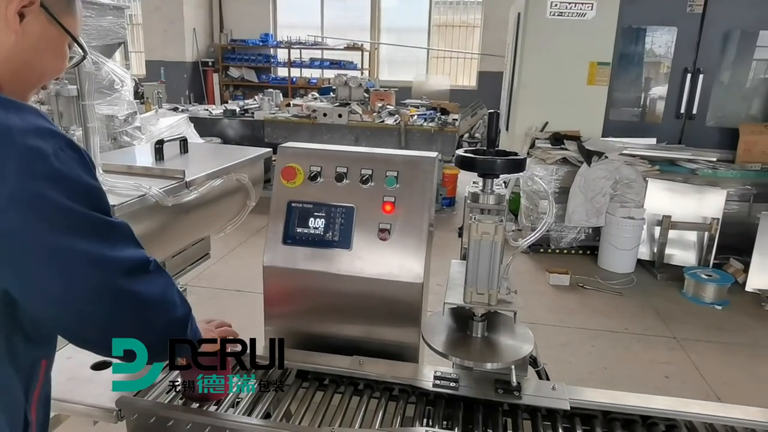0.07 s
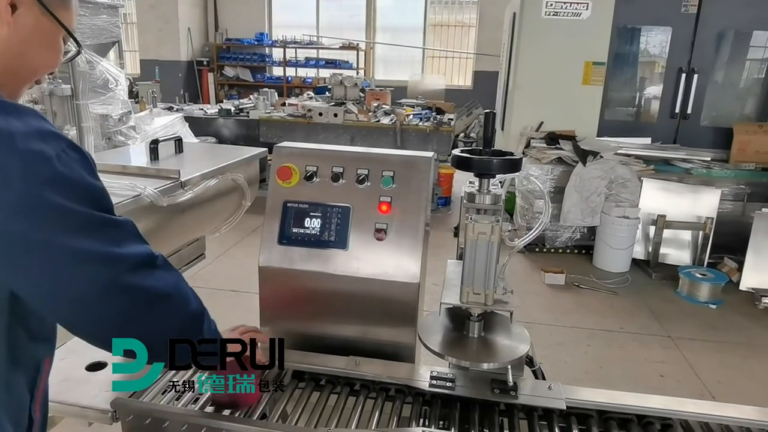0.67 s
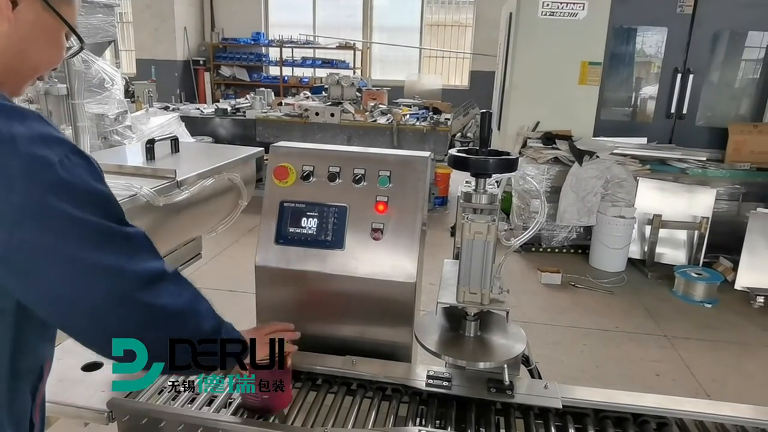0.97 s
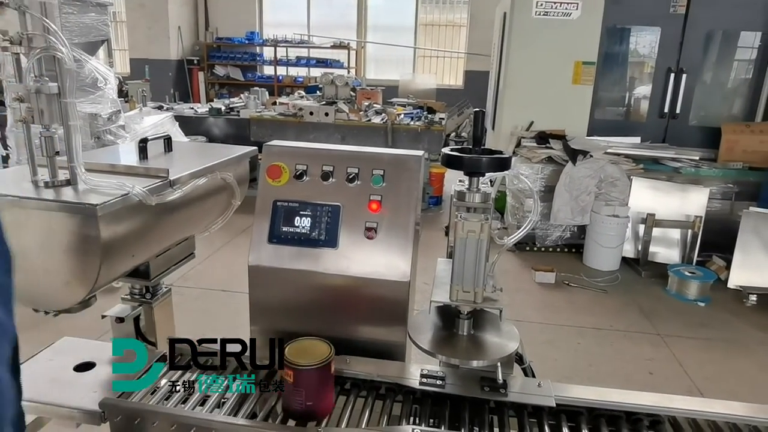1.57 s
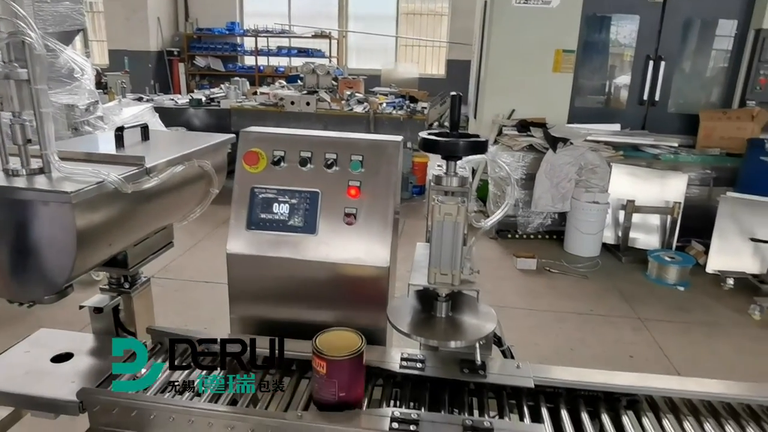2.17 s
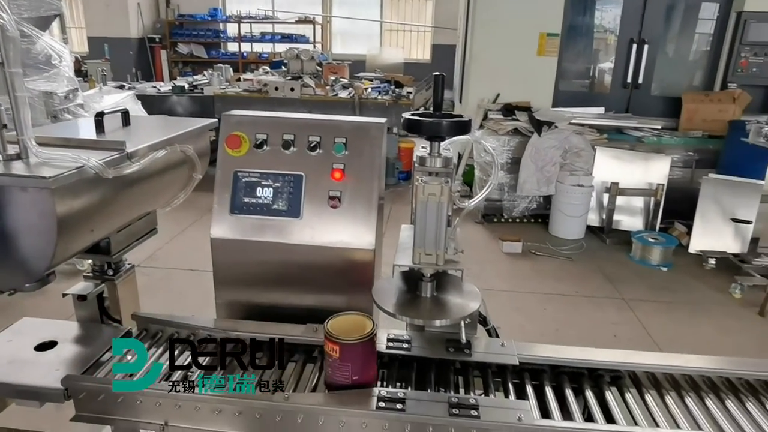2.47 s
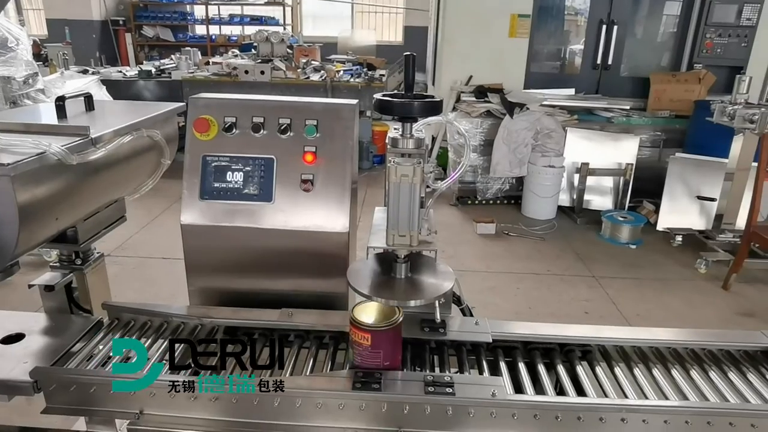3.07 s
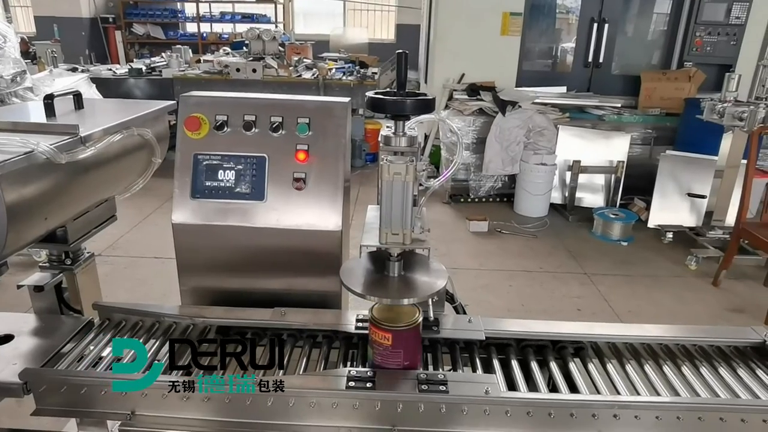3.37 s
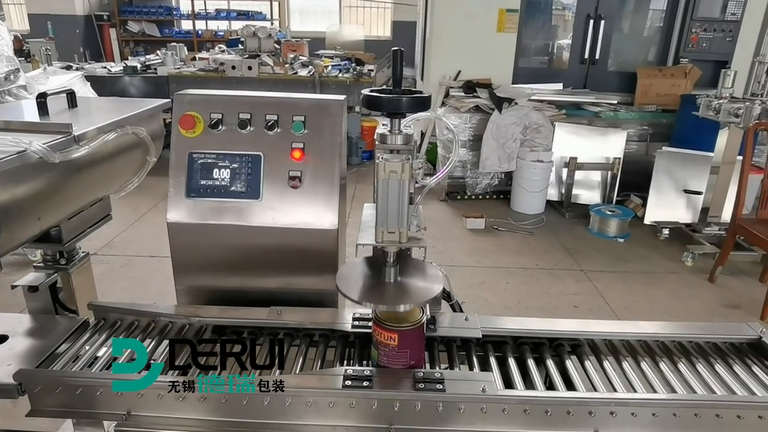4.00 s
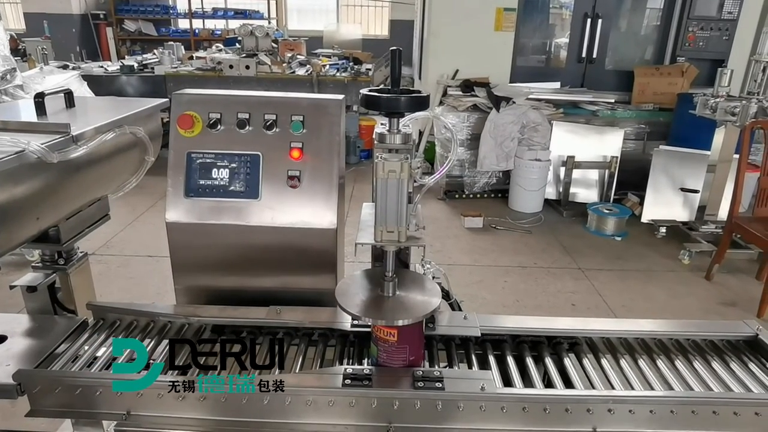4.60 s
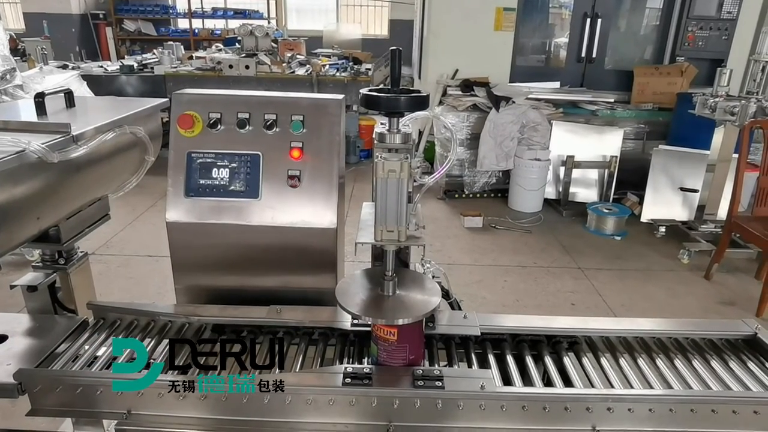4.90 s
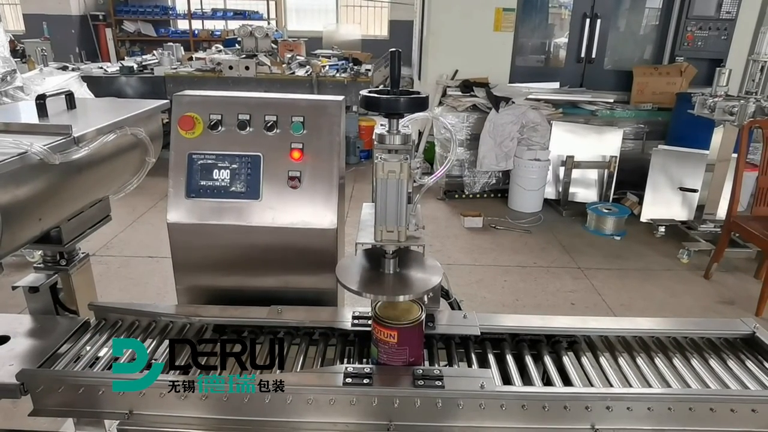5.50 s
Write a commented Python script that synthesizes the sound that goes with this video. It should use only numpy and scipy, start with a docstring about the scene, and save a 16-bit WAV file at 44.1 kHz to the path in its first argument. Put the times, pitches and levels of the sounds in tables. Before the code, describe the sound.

Steel rollers rumble and rattle steadily with a hiss and a faint motor hum, heard from nearby. Scattered metal clacks and a very high, intermittent bearing squeal run through it as a tin travels along. Near the end a valve puffs air and a lid press thuds down, then knocks back up amid sharp clacks and the ring of the tin. The workshop adds a short echo.

```python
"""A roller conveyor carries a tin through a workshop to an air-driven lid press.
The rollers rumble, hiss and tick, a dry bearing squeals, and the motor hums.
Steel clacks on steel, and the thin tin rings when it is knocked. Near the end the
valve puffs air, the press comes down on the lid with a shudder and knocks back up.
Nearby steel sheets and the walls add short echoes."""
import sys
import numpy as np
from scipy import signal
from scipy.fft import rfft, irfft, next_fast_len
from scipy.io import wavfile
from scipy.ndimage import uniform_filter1d

SR = 44100
rng = np.random.default_rng(int(sys.argv[2]) if len(sys.argv) > 2 else 0)


def to_wav(s):
    """Save 16-bit WAV."""
    ch = np.atleast_2d(s).T  # columns
    pcm = np.round(np.clip(ch, -1, 1) * 32767)  # PCM
    wavfile.write(sys.argv[1], SR, pcm.astype(np.int16))


N = 249165
T = np.arange(N) / SR

# how alike the line sounds in both ears: (frequency [Hz], likeness [1 = same, 0 = unrelated])
LINE_LIKENESS = [(100, 0.97), (250, 0.96), (500, 0.78), (1000, 0.0018), (2200, -0.049), (4000, 0.012),
                 (6500, -0.041), (8200, -0.092)]
# notes at which the roller frame and tin ring: (pitch [Hz], width [Hz], relative level [dB])
STEEL_NOTES = [(274, 160, 4), (524, 36, -17), (727, 37, 10), (1290, 9.7, 8), (1610, 50, 4.5),
               (2150, 220, 7.5), (2564, 52, 13)]


def conveyor():
    """The turning rollers rumble and hiss, and their frame adds a deeper rumble."""
    # tone of the rollers, frame, hiss and highest hiss: (frequency [Hz], relative level [dB])
    roller_tone = [(45, -39), (75, -2.5), (150, -6), (297, -10), (330, -12.5), (480, -17.5), (531, -6),
                   (641, -14.5), (1010, -15), (1100, -11), (1330, -17.5), (1890, -16), (2430, -13.5),
                   (3600, -24.5), (4700, -38), (7900, -120)]
    frame_tone = [(15, -30), (25, 5), (40, 5), (58, 12.5), (75, 2.5), (110, -51)]
    hiss_tone = [(1700, -18), (2450, 2.5), (3000, -1), (4000, -3), (5000, 4.5), (5700, 1.5), (6400, 5),
                 (7200, 0.5), (8600, 5.5), (9300, -11.5), (10500, -57)]
    sizzle_tone = [(7500, -39), (8800, 4), (9800, 2), (11000, -19.5), (14000, -12.5), (15500, -34)]
    # how the frame's rumble and the hiss rise and fall: (time [s], relative level [dB])
    frame_levels = [(0.0, -46), (0.36, -50.5), (1.76, -57), (2.16, -47), (3.62, -51), (5.44, -51.5),
                    (5.65, -51)]
    hiss_levels = [(0.0, -35.5), (0.22, -45.5), (1.15, -46), (4.2, -43), (4.45, -50), (4.86, -50.5),
                   (5.18, -51), (5.35, -42), (5.65, -39)]
    nearer_db = 0.27 * T  # the rollers draw nearer
    rumble = from_db(-41.5 + nearer_db + 1.38 * drift(30)) * noise(roller_tone)
    frame = from_db(over_time(frame_levels) + 0.5) * noise(frame_tone)
    hiss = from_db(over_time(hiss_levels) + 4) * noise(hiss_tone)
    # the highest hiss drops away for a moment, then returns
    sizzle = from_db(-51 - 23 * treble_dip()) * noise(sizzle_tone)
    flutter = from_db(1.6 * drift(40))  # uneven rubbing makes the whole hiss flutter together
    return frame + panel_echoes(rumble + rattle() + flutter * (hiss + sizzle))


def rattle():
    """Small random ticks run through the steel frame and make it ring."""
    ticks_per_s = 70
    ticks = (rng.random(N) < ticks_per_s / SR) * rng.standard_normal((2, N))
    ticks = signal.sosfilt(signal.butter(4, 4500, fs=SR, output="sos"), ticks + 1e-18)
    ringing = sum(from_db(db) * resonate(ticks, hz, width) for hz, width, db in STEEL_NOTES)
    return from_db(-53) * unit_power(ringing)


def clacks():
    """Steel hits steel along the line, setting the roller frame and tin ringing."""
    # (time [s], relative level [dB], time to fade 60 dB [s], ring [Hz], ring boost [dB], dull above [Hz])
    hits = [(0.001, -34, 0.16, 1140, 25, 9000), (0.130, -23.5, 0.096, 3600, 14, 9050),
            (0.469, -25.5, 0.03, 7060, 14.5, 10200), (0.717, -34.5, 0.082, 5250, 18, 9000),
            (0.964, -27.5, 0.21, 1230, 4, 4000), (1.592, -29, 0.019, 5160, 17, 9000),
            (1.633, -22, 0.088, 2110, 1, 4470), (2.288, -25.5, 0.13, 2660, 6, 6000),
            (2.487, -22, 0.14, 1080, 0, 1300), (2.754, -22.5, 0.053, 2750, 15, 4500),
            (3.281, -30.5, .05, 5100, 13, 8000), (3.467, -26, 0.098, 2400, 9, 5000),
            (3.6155, -17.5, 0.11, 9560, 5, 9100), (3.620, -24, 0.24, 2490, 13, 5130),
            (3.643, -19, 0.19, 1630, 12.5, 2940), (3.663, -23, 0.078, 750, 6, 1800),
            (4.270, -18.5, 0.081, 1290, 24, 6100), (4.283, -21, 0.12, 1640, 12, 2980),
            (4.362, -23, 0.24, 1380, 16, 3460), (4.383, -18, 0.17, 1440, 14, 2950),
            (4.401, -23, 0.098, 2710, 18, 2750), (4.422, -22, 0.13, 2050, 10.5, 2390),
            (5.250, -15.5, 0.17, 2470, 17.5, 9600), (5.254, -15, 0.02, 2150, 7, 9400),
            (5.280, -23, 0.13, 1820, 8, 8860), (5.300, -14, 0.072, 2120, 13, 5800),
            (5.318, -15, 0.087, 2420, 4, 4850), (5.520, -22.5, 0.22, 2900, 9, 5040)]
    return blows(hits, STEEL_NOTES, ring_sharpness=16.6, direct_db=-1.5, rise_s=0.00071)


def bearing_squeal():
    """A dry bearing catches and sings on close, beating notes, or slips to a weaker, lower one."""
    # notes of the bearing: (pitch [Hz], width [Hz], relative level [dB])
    notes = [(8150, 46, -9), (8110, 28, -1), (8162, 40, 1.5), (8205, 59, 2.5), (8020, 220, -8),
             (7800, 190, -25)]
    # main and lower squeals: (start [s], length [s], relative level [dB], fade [dB per s])
    main_squeals = [(-0.04, 0.24, -25.5, 30.5), (0.71, 0.18, -33, 45), (1.37, .06, -39.5, 49),
                    (1.69, 0.039, -22, 164), (1.78, 0.3, -38, 30), (2.08, 0.24, -27.5, 52),
                    (2.61, 0.049, -32, 60), (2.71, 0.44, -24.5, 105), (3.2, 1.304, -28, 49),
                    (4.82, 0.14, -34, 63), (4.975, 0.36, -23.5, 22)]
    low_squeals = [(-0.06, .2, -36.5, 130), (1.16, 0.061, -40, 60), (2.5, .11, -40, 38)]
    flutter = from_db(1.5 * drift(30))
    main = swells(main_squeals, rise_s=0.025) * friction_tone(notes, smooth_s=0.037, evenness=0.7)
    low_note = friction_tone([(7540, 82, 0)], smooth_s=0.038, evenness=0.45)
    return flutter * (main + swells(low_squeals, rise_s=0.056) * low_note)


def press():
    """Air rushes from the valve, the piston shakes the table, and the head knocks on its stops."""
    # air puffs and table shudders: (start [s], length [s], relative level [dB], fade [dB per s])
    puffs = [(4.015, 0.021, -29, 250), (4.07, 0.086, -39, 330), (5.125, 0.053, -29.5, 60),
             (5.49, 0.058, -35, 110)]
    shudders = [(4.07, .1, -28.5, 60), (4.338, 0.062, -22, 96), (5.12, 0.032, -36, 93),
                (5.44, 0.14, -24, 170)]
    # tone of the escaping air: (frequency [Hz], relative level [dB])
    air_tone = [(500, -33), (2500, -12), (4200, -9), (5500, -5), (6500, 3), (7600, -15), (9500, -0.5),
                (11500, -9), (14000, -13.5), (16000, -31)]
    # notes of the press's table and column: (pitch [Hz], width [Hz], relative level [dB])
    table_notes = [(102.5, 12.6, 0.5), (128.7, 5.9, -5.5), (213.5, 25, -8), (251, 76, -10.5)]
    column_notes = [(229, 14, 20), (570, 36, 1.5), (758, 150, 12.5), (1040, 126, 12.5), (1387, 62, 10)]
    # the head meets its stops:
    # (time [s], relative level [dB], time to fade 60 dB [s], ring [Hz], ring boost [dB], dull above [Hz])
    hits = [(4.099, -20.5, 0.031, 2180, 14.5, 3500), (4.100, -14, 0.045, 800, 15, 1500),
            (4.105, -19, 0.23, 1090, 10, 1560), (4.345, -19.5, 0.11, 386, 17, 900),
            (5.143, -23.5, 0.17, 223, 13, 227), (5.440, -18.5, 0.11, 2120, 14, 2370),
            (5.446, -18, 0.27, 1490, 4.5, 1500), (5.455, -10.5, 0.08, 272, 10.5, 1100),
            (5.475, -24.5, 0.48, 337, 18, 1320)]
    air = swells(puffs, rise_s=0.015) * from_db(3.4 * drift(90)) * noise(air_tone)
    shudder = swells(shudders, rise_s=0.039) * friction_tone(table_notes, smooth_s=0.025, evenness=0.95)
    knocks = blows(hits, column_notes, ring_sharpness=6.0, direct_db=-3.0, rise_s=0.00061)
    return air + shudder + knocks


def tin():
    """The thin steel tin rings on; each knock tops up its notes."""
    # knocks on the tin: (time [s], level [dB])
    hits = [(0.001, -31.5), (0.135, -41), (3.622, -35), (4.403, -31.5), (5.262, -23), (5.302, -41)]
    # notes of the tin: (pitch [Hz], level against the lowest note [dB], share of the ring time [0 to 1])
    notes = [(1259, 0, 1), (1585, -16, .4), (2185, -12, .4), (2530, -10, .6)]
    ring_s = 0.3  # time to fade 60 dB
    out = np.zeros((2, N))
    for hz, note_db, share in notes:
        swing = sum((T >= s) * from_db(db - 60 * np.abs(T - s) / (share * ring_s)) for s, db in hits)
        phase = rng.uniform(0, 2 * np.pi) + np.array([[0], [0.6]])
        out += from_db(note_db) * swing * np.sin(2 * np.pi * hz * T + phase)
    return out * from_db([[1], [-1]])  # a little louder on the left


def motor():
    """The motor and gearbox hum on tones that waver with the load."""
    # tones of the motor and gears: (pitch [Hz], level [dB])
    tones = [(64.6, -54), (301.5, -56), (541, -60.5), (1087, -59), (2396, -52.5), (2595, -57)]
    whine_drop_db = 14 * treble_dip()  # the high gear whine sinks for a moment
    hum = 0
    for hz, db in tones:
        phase = 2 * np.pi * np.cumsum(hz + 7 * drift(25)) / SR
        right_shift = np.arccos(np.clip(at_hz(LINE_LIKENESS, hz), -1, 1)) * np.array([[0], [1]])
        level_db = db + 3.9 * drift(18) - whine_drop_db * (hz > 1800)
        hum = hum + np.sqrt(2) * from_db(level_db) * np.sin(phase + right_shift)
    return hum


def panel_echoes(sound, count=6, echo_db=-19):
    """Nearby steel sheets throw back quick echoes of the middle and high tones."""
    bright = signal.sosfilt(signal.butter(1, 400, "high", fs=SR, output="sos"), sound)
    delays_s = rng.uniform(0.002012, 0.022, count)
    out = sound.copy()
    for k, lag in enumerate((delays_s * SR).astype(int)):
        out[:, lag:] += (-1) ** k * from_db(echo_db) * bright[:, :-lag]
    return out


def room_echo(sound, fade_s=0.2, dull_hz=4000):
    """Walls and machines scatter the sound into a short, slightly dull tail."""
    t = T[:SR * 3 // 4]
    tail = rng.standard_normal((2, len(t))) * from_db(-60 * t / fade_s) * (t > 0.008)
    tail = signal.sosfilt(signal.butter(1, dull_hz, fs=SR, output="sos"), tail)
    return signal.fftconvolve(sound, tail / np.sqrt(np.sum(tail ** 2) / 2), axes=1)[:, :N]


def blows(hits, body_notes, ring_sharpness, direct_db, rise_s):
    """Each hit is a dying burst of noise that rings the struck spot and then the whole body."""
    # tone of steel meeting steel: (frequency [Hz], relative level [dB])
    clatter_tone = [(30, -21), (120, 2), (1000, -4), (4000, -0.5), (9800, 7.5), (12000, -5), (15000, -6)]
    # how alike nearby hits sound in both ears: (frequency [Hz], likeness [1 = same, 0 = unrelated])
    hit_likeness = [(100, .99), (500, 0.95), (1000, 0.92), (2200, 0.35), (4000, 0.12), (9000, 0.51)]
    clatter = noise(clatter_tone, hit_likeness)
    direct, size = np.zeros((2, N)), SR // 2
    for s, db, fade_s, ring_hz, ring_db, dull_hz in hits:
        start = round(s * SR)
        burst = clatter[:, start:start + size]
        t = T[:burst.shape[1]]
        burst = burst * from_db(db - 60 * t / fade_s) * (1 - np.exp(-t / rise_s))
        burst = signal.sosfilt(signal.butter(2, dull_hz, fs=SR, output="sos"), burst)
        ring = from_db(ring_db) * resonate(burst, ring_hz, ring_hz / ring_sharpness)
        direct[:, start:start + size] += burst + ring
    body = sum(from_db(db - 7.5) * resonate(direct, hz, width) for hz, width, db in body_notes)
    return from_db(direct_db) * direct + body


def friction_tone(notes, smooth_s, evenness):
    """Rubbing keeps a part's notes sounding; the contact limits how far they swing."""
    rub, tone = noise(), 0
    for hz, width, db in notes:
        ring = resonate(resonate(rub, hz, width), hz, width)
        tone = tone + from_db(db) * unit_power(ring)
    power = uniform_filter1d(np.mean(tone ** 2, axis=0), int(smooth_s * SR))
    return unit_power(tone / (np.abs(power) + 0.00083) ** (evenness / 2))  # evens out loud and soft


def swells(events, rise_s):
    """Loudness curve of a row of events: each rises, then fades once its length is over."""
    power = 0
    for s, length, db, fade in events:
        rise = np.clip((T - s) / rise_s, 0, 1)
        power = power + (rise * from_db(db - fade * np.maximum(T - s - length, 0))) ** 2
    return np.sqrt(power)


def treble_dip(start_s=4.40, end_s=5.14, ease_s=0.063):
    """Eases from 0 to 1 and back for the moment when the highest hiss and whine drop away."""
    return np.clip(np.minimum(T - start_s, end_s - T) / ease_s, 0, 1)


def noise(tone=None, likeness=LINE_LIKENESS):
    """Stereo noise with a given tone, alike in both ears in the bass and spread out in the treble."""
    # lean to one side: (frequency [Hz], left minus right [dB])
    balance = [(100, 0.6), (500, 1.5), (1200, 1), (2200, 0), (4000, -2), (6000, -4.5), (8000, 0.5),
               (12000, 1.5)]
    size = next_fast_len(N)
    hz = np.fft.rfftfreq(size, 1 / SR)
    shared, opposite = rfft(rng.standard_normal((2, size)))
    alike = np.clip(at_hz(likeness, hz), -0.999, 0.999)
    sides = np.array([[1], [-1]])
    spectrum = np.sqrt(1 + alike) * shared + np.sqrt(1 - alike) * opposite * sides
    spectrum *= from_db(sides * at_hz(balance, hz) / 2)
    gain = 1 if tone is None else from_db(at_hz(tone, hz))
    return unit_power(irfft(spectrum * gain, size)[:, :N])


def resonate(sound, hz, width):
    """Let a sound ring at one pitch; the smaller the width, the longer it rings."""
    decay = np.exp(-np.pi * width / SR)
    feed = np.array([1, 0, -1]) * (1 - decay ** 2) / 2
    feedback = [1, -2 * decay * np.cos(2 * np.pi * hz / SR), decay ** 2]
    return signal.lfilter(feed, feedback, sound + 1e-18)


def drift(turns_per_s):
    """A random wander around zero, roughly 1 in size."""
    points = rng.standard_normal(2000)
    return np.interp(T * turns_per_s, np.arange(len(points)), points)


def over_time(points):
    """Join (time, value) points into one value for each sample."""
    times, values = np.transpose(points)
    return np.interp(T, times, values)


def at_hz(points, hz):
    """Read between (frequency, value) points, giving each octave equal room."""
    frequencies, values = np.transpose(points)
    return np.interp(np.log(hz + 1), np.log(frequencies), values)


def from_db(db):
    """Turn decibels into a number to multiply by."""
    return 10 ** (np.asarray(db) / 20)


def unit_power(sound):
    """Scale a sound to an average power of 1."""
    return sound / np.sqrt(np.mean(sound ** 2) + 1e-20)


def scene():
    """The running line, with the press, the clacks and the tin echoing in the room."""
    work = panel_echoes(press() + clacks()) + tin()
    return conveyor() + motor() + bearing_squeal() + work + from_db(-27.5) * room_echo(work)


def record(dry):
    """Cut the very highest treble steeply."""
    cutoff_hz = 15200
    return signal.sosfilt(signal.ellip(10, 0.1, 80, cutoff_hz, fs=SR, output="sos"), dry)


dry = scene()
out = record(dry)
to_wav(out)
```